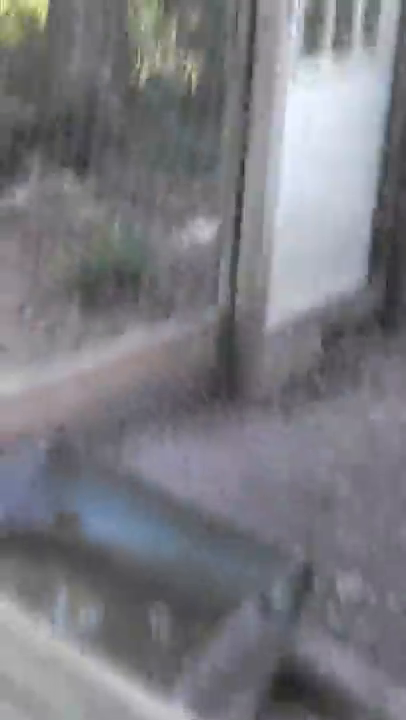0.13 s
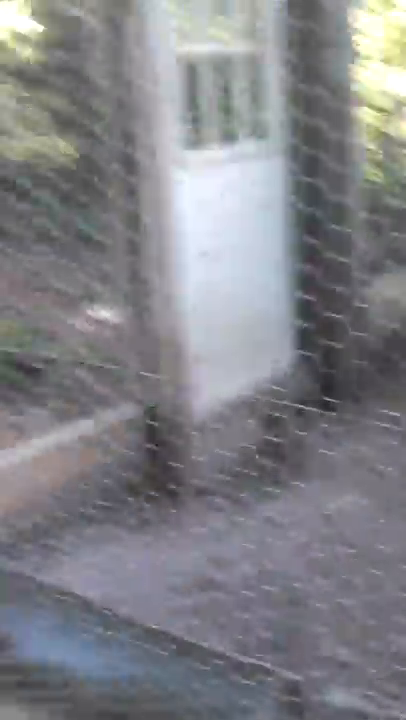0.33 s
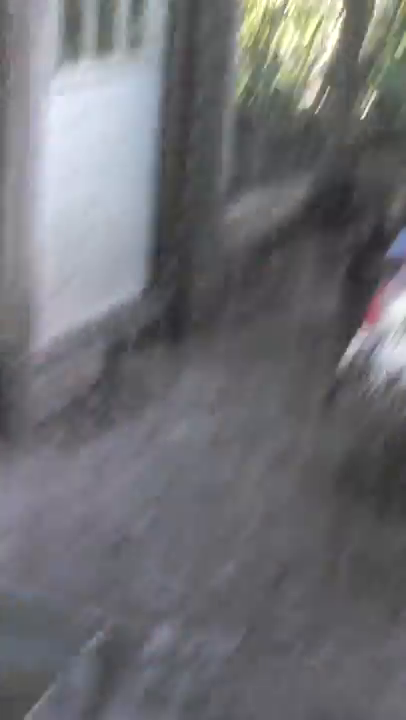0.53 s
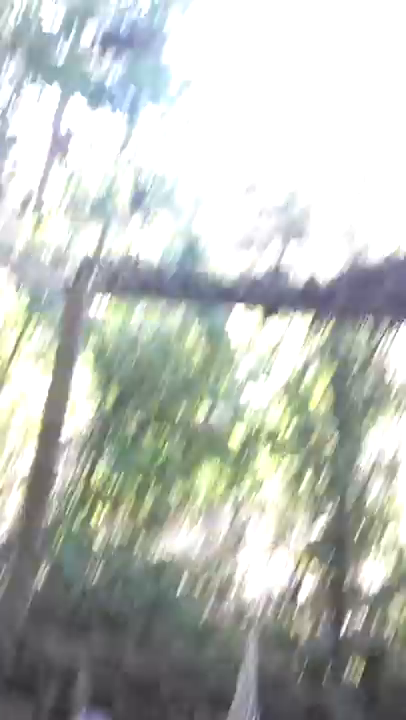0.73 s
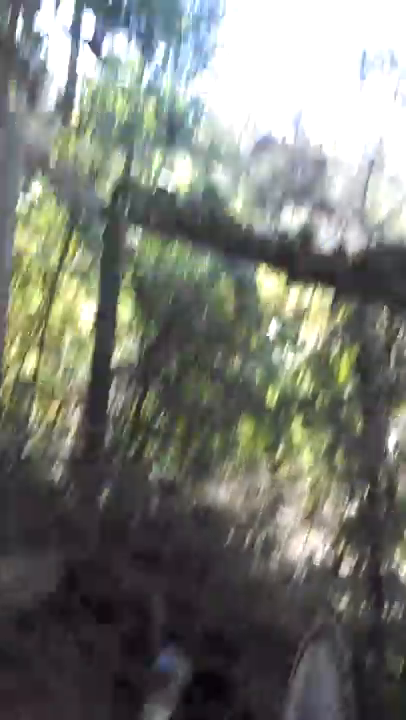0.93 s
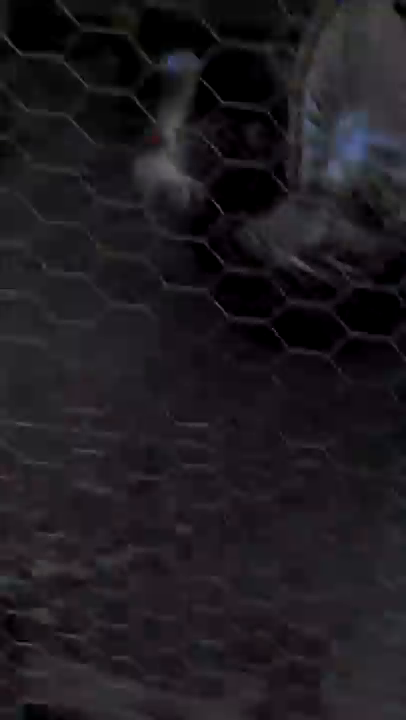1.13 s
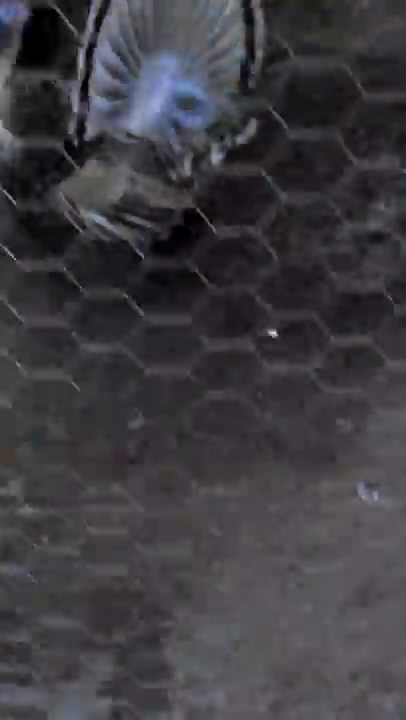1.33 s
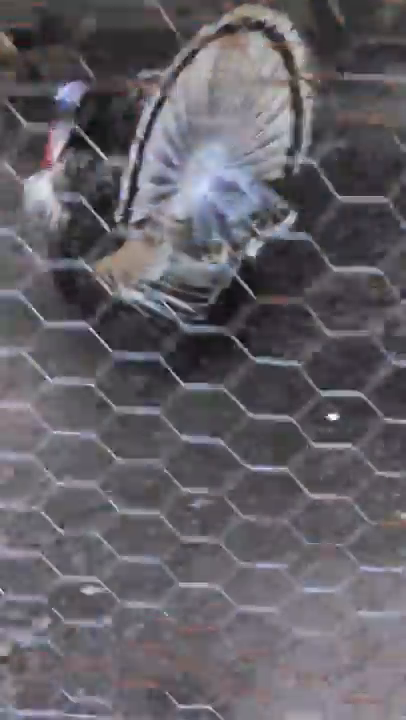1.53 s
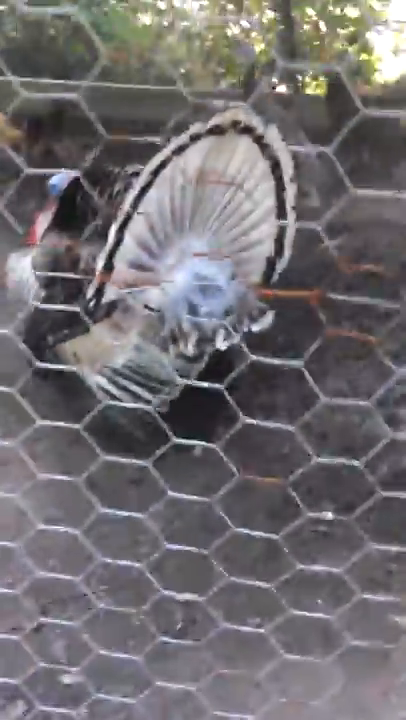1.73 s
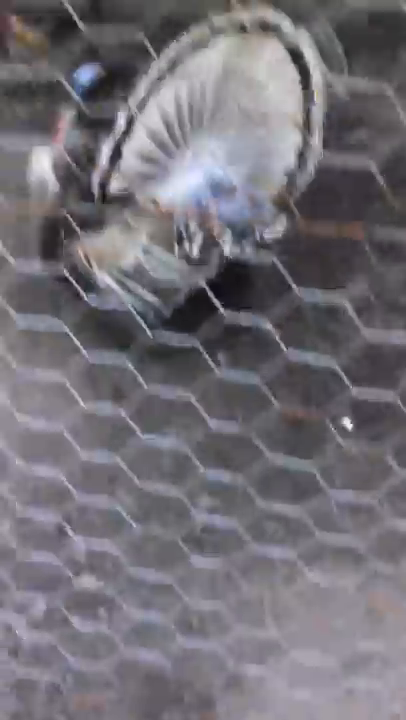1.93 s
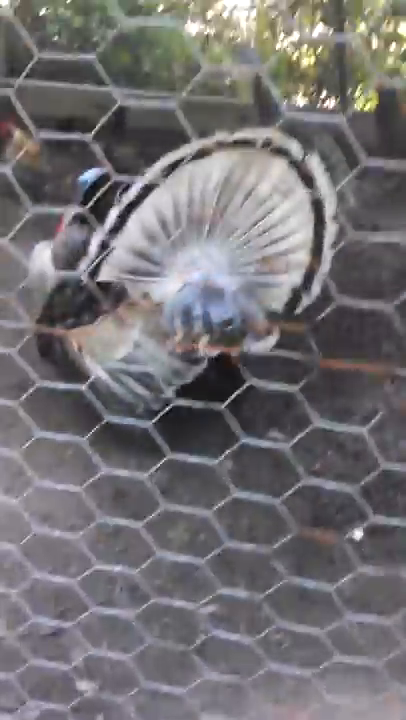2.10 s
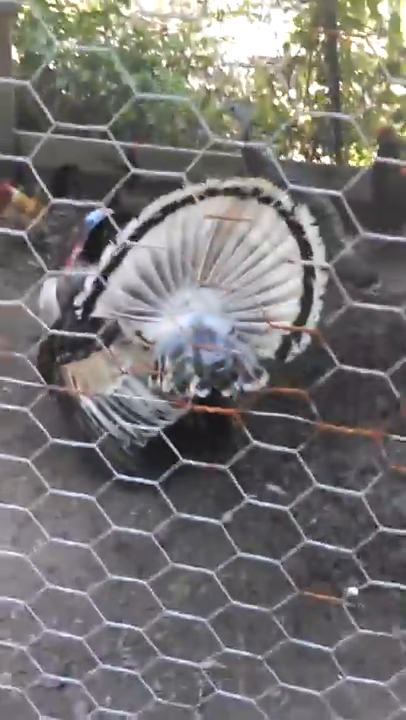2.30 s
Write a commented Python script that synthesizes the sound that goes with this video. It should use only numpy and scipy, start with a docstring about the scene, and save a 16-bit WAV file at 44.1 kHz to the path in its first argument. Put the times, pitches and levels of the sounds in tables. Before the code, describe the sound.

A turkey spits once, sharp and hissing, at 1.5 seconds, with a short deep drum beneath, then drags its wing tips on dirt until about 2. Before that come soft rustles, scuffs, small ticks and a faint whistle near 0.7. Taps land at 1.35 and 1.85. The hand-held microphone thumps now and then, most around 2 seconds. Outdoor air and a distant machine hum continue throughout.

```python
"""An outdoor pen of chicken wire, where a tom turkey struts. He gives one sharp spit (pulses ring his
throat's resonances, then escaping air hisses) over a low drum, and drags his wing tips on the dirt.
Around him are friction sounds (rustles, scuffs), small impacts (ticks, taps), a faint whistle, a soft
low note, a wash of air and the hum of a distant machine. All is heard through a hand-held pair of
microphones that thump now and then."""
import sys
import numpy as np
from scipy import signal
from scipy.fft import rfft, irfft
from scipy.io import wavfile

SR = 44100
rng = np.random.default_rng(int(sys.argv[2]) if len(sys.argv) > 2 else 0)


def bounce(signal):
    """Save signal as a 16-bit WAV file at the path given by the first command-line argument."""
    frames = np.transpose(np.atleast_2d(signal))
    limited = np.clip(frames, -1, 1)
    pcm = np.round(limited * 32767).astype(np.int16)
    wavfile.write(sys.argv[1], SR, pcm)


N = 108397
T = np.arange(N) / SR
HZ = np.fft.rfftfreq(2 * N, 1 / SR)


def amp(db):
    """Amplitude ratio: 20 dB to a factor of ten."""
    return 10 ** (np.asarray(db) / 20)


def read(points):
    """Interpolation of a table over log frequency, at every bin."""
    f, value = np.transpose(points)
    return np.interp(np.log(HZ + 1), np.log(f + 1), value)


def colour(x, spectrum):
    """Minimum-phase filtering: unit white noise takes on the given spectral density."""
    log_gain = np.log(amp(read(spectrum)) * np.sqrt(SR / 2))
    cepstrum = irfft(log_gain)
    cepstrum[1:N] *= 2
    cepstrum[N + 1:] = 0
    return irfft(rfft(x, 2 * N) * np.exp(rfft(cepstrum)))[..., :N]


def noise():
    """Gaussian white noise of unit variance."""
    return rng.standard_normal(N)


def twin_noise(apart=0.3):
    """Partial coherence: an extended source gives nearly the same noise at both microphones."""
    return (noise() + apart * np.array([noise(), noise()])) / np.hypot(1, apart)


def wander(rate_hz):
    """Random modulation: low-passed noise of unit variance."""
    x = irfft(rfft(noise(), 2 * N) * np.exp(-(HZ / rate_hz) ** 2))[:N]
    return x / x.std()


def phasor_wander(rate_hz):
    """Complex modulation: amplitude and phase both drift."""
    return wander(rate_hz) + 1j * wander(rate_hz)


def envelope(start, rise, hold, fall):
    """Linear attack, hold and exponential decay, in seconds."""
    return np.clip((T - start) / rise, 0, 1) * np.exp(-np.maximum(T - start - rise - hold, 0) / fall)


def swell(centre, width):
    """Gaussian envelope, in seconds."""
    return np.exp(-.5 * ((T - centre) / width) ** 2)


def tone_burst(time_s, width_s, hz, db):
    """Wave packet: a sinusoid under a Gaussian envelope."""
    return amp(db) * swell(time_s, width_s) * np.cos(2 * np.pi * hz * (T - time_s))


def resonate(x, hz, bandwidth):
    """Damped resonance with unit gain at its peak."""
    r = np.exp(-np.pi * bandwidth / SR)
    return 2 * signal.lfilter([1 - r], [1, -r * np.exp(2j * np.pi * hz / SR)], x + 1e-18).real


def friction(strokes, spectrum, grain_db=2):
    """Sliding friction: grainy noise whose strokes add in power."""
    level = np.sqrt(sum((amp(db) * swell(s, width)) ** 2 for s, width, db in strokes))
    return colour(twin_noise() * level * amp(grain_db * wander(rate_hz=400)), spectrum)


def strikes(rows, ring_db, snap_db):
    """Impact excitation: each strike is an impulse and a decaying random rattle."""
    out = noise() * amp(ring_db) * sum(amp(db) * envelope(s, 1 / SR, 0, ring) for s, db, ring in rows)
    for s, db, _ in rows:
        out[round(s * SR)] += amp(db + snap_db)
    return out


def off_axis(x, lead_s, pan_db):
    """Time and level differences give direction; positive values favour the left microphone."""
    half_lead = np.exp(1j * np.pi * HZ * lead_s)
    pair = irfft(rfft(x, 2 * N) * np.array([half_lead, 1 / half_lead]))[:, :N]
    return pair * amp([[pan_db / 2], [-pan_db / 2]])


# Inequality between the microphones (frequency [Hz], share [0-1])
SHADOW = [(60, 0.5), (150, 0.52), (350, 0.3), (700, 0.42), (1400, 1), (3000, 0.73), (15000, 0.98)]

def shaded(x, side):
    """Acoustic shadow: the housing screens one microphone, most in the treble; side > 0 favours left."""
    share = side * read(SHADOW)
    return irfft(rfft(x, 2 * N) * np.array([1 + share, 1 - share]))[:, :N]


# Outdoor wash (frequency [Hz], density [dB/Hz])
AIR_SPECTRUM = [(20, -95), (45, -67.5), (68, -65.5), (110, -68.5), (190, -78.5), (330, -71.5), (480, -73.5),
                (660, -79.5), (820, -77.5), (1100, -81), (2400, -86), (4000, -88), (7000, -87.5),
                (8300, -101.5), (10000, -109), (15000, -110)]
# Its likeness at the two microphones (frequency [Hz], correlation [0-1])
AIR_CORRELATION = [(100, .93), (350, 0.88), (700, 0.61), (1500, 0.81), (12000, 0.6)]

def air(swell_db=0.5):
    """Ambient field: common and independent noise mix to a partly coherent wash."""
    same = read(AIR_CORRELATION)
    shared, left, right = rfft(np.array([noise(), noise(), noise()]), 2 * N)
    wash = irfft(np.sqrt(same) * shared + np.sqrt(1 - same) * np.array([left, right]))[:, :N]
    return colour(wash * amp(swell_db * wander(rate_hz=22)), AIR_SPECTRUM)


def tone(hz, waver):
    """Line broadening: a tone of unit power wavers slowly."""
    drift = 1 + waver * phasor_wander(rate_hz=4.6)
    return np.sqrt(2 / (1 + 2 * waver ** 2)) * (drift * np.exp(2j * np.pi * hz * T)).real


# The machine's lesser tones (frequency [Hz], level [dB])
HUM_LINES = [(293, -59), (376, -53), (467, -60.5), (540.5, -58.5), (563.6, -54), (727, -59.5),
             (751.8, -55.5)]
# Course of its main tone (time [s], level [dB])
DRONE_LEVEL = [(0, -43.5), (.2, -42.5), (.42, -57.5), (.8, -54.5), (.9, -46), (1.12, -42.5), (1.35, -49),
               (1.55, -51), (1.75, -50), (2.0, -48), (2.25, -46), (2.46, -43.5)]
HUM_LEAD_S, HUM_PAN_DB = -0.00013, -4.5

def hum(drone_hz=514.4):
    """Line spectrum of a distant machine; the main tone flutters, and comes and goes."""
    flutter = 0.27 * phasor_wander(rate_hz=29.6)
    drone = tone(drone_hz, waver=0.2) + (flutter * np.exp(2j * np.pi * drone_hz * T)).real
    drone *= amp(np.interp(T, *np.transpose(DRONE_LEVEL)))
    lines = sum(amp(db) * tone(hz, waver=0.45) for hz, db in HUM_LINES)
    return off_axis(drone + lines, HUM_LEAD_S, HUM_PAN_DB)


# Bumps on the microphones (time [s], width [s], frequency [Hz], level [dB])
MIC_BUMPS = [(.012, 0.011, 65, -38.5), (.34, 0.011, 68, -37), (1.036, 0.0088, 70.5, -29.5),
             (1.36, 0.04, 66.6, -34.5), (1.49, 0.0063, 99, -27), (1.846, 0.0044, 141, -27.5),
             (1.866, 0.0071, 114, -25.5), (1.888, 0.018, 78, -31), (1.926, .0095, 76, -23.5),
             (1.952, 0.01, 78.6, -21.5), (2.018, 0.0064, 115, -23), (2.031, 0.012, 85, -27.5),
             (2.07, .017, 55.2, -33), (2.289, 0.032, 65.6, -34)]

def thumps(rumble_db=-12.5):
    """Low-frequency transients: handling or puffs of air bump the microphones, with a little rumble."""
    level = sum(amp(db) * swell(s, width) for s, width, _, db in MIC_BUMPS)
    rumble = amp(rumble_db) * wander(rate_hz=310) * level
    return shaded(rumble + sum(tone_burst(*row) for row in MIC_BUMPS), -1.15)


# Dry brushing (time [s], width [s], body gain [dB], fizz gain [dB])
RUSTLE_STROKES = [(.014, .014, 3.5, 4), (.089, 0.059, -1, -1.5), (.22, 0.073, -6.5, -13),
                  (0.269, 0.0023, -2.5, -15), (.287, 0.0027, -5, -15), (.304, .002, -5, -14),
                  (0.328, .003, -3.5, -14), (.4, 0.03, -6.5, -9), (.536, 0.0053, -4, -12),
                  (.562, 0.022, -7, -12), (.66, 0.14, -10, -34), (.815, 0.0069, -4, -7),
                  (.861, .028, 0, -4), (1.09, 0.29, -14.5, -17.5), (1.356, 0.022, -4, -12),
                  (1.67, .011, -8, -11), (2.4, .078, -13.5, -36)]
# Its body and its fizz (frequency [Hz], density [dB/Hz])
RUSTLE_SPECTRUM = [(400, -86), (800, -74.5), (1500, -83), (2300, -76), (4000, -74), (5500, -75),
                   (7000, -74), (8400, -82.5), (10000, -93), (15000, -115)]
FIZZ_SPECTRUM = [(4000, -110), (8000, -73), (10500, -93.5), (12500, -82), (15000, -89.5)]

def rustles():
    """Friction noise in two bands: dry brushing with a finer fizz on top."""
    body = friction([(s, width, db) for s, width, db, _ in RUSTLE_STROKES], RUSTLE_SPECTRUM)
    fizz = friction([(s, width, db) for s, width, _, db in RUSTLE_STROKES], FIZZ_SPECTRUM)
    return body + fizz


# Strokes on dirt (time [s], width [s], grit gain [dB], note frequency [Hz], note level [dB])
SCUFF_STROKES = [(.395, .015, 3.5, 345, -43.5), (0.648, .015, 4.5, 406, -44), (2.012, .011, 2, 337, -43.5),
                 (2.173, 0.013, 4, 870, -42), (2.371, 0.021, 1, 344, -40)]
# Their grit (frequency [Hz], density [dB/Hz])
SCUFF_SPECTRUM = [(100, -89), (380, -69.5), (650, -78), (1000, -77), (1550, -73.5), (2400, -81.5),
                  (3700, -79), (5000, -100), (8000, -100), (15000, -115)]

def scuffs(bandwidth_hz=77):
    """Friction on dirt, each stroke with a hollow note from a noise-driven resonance."""
    notes = sum(amp(db) * resonate(noise() * swell(s, width), hz, bandwidth_hz)
                for s, width, _, hz, db in SCUFF_STROKES)
    grit = friction([row[:3] for row in SCUFF_STROKES], SCUFF_SPECTRUM)
    return grit + notes * np.sqrt(SR / (np.pi * bandwidth_hz))


# Fine impacts (time [s], body gain [dB], edge gain [dB])
TICK_STRIKES = [(.563, -12, 1), (0.724, 2.5, 0), (.731, -5, -4), (0.936, -4, -2), (.946, -2, -9),
                (1.014, -4, -1.5), (1.074, 6.5, -3), (1.135, -2, -3), (1.218, -0.5, 0), (1.287, 2, 7),
                (1.29, -6, 2)]
# Their body and their fizzy edge (frequency [Hz], density [dB/Hz])
TICK_SPECTRUM = [(1000, -100), (4000, -74.5), (7000, -65.5), (9500, -80), (15000, -100)]
EDGE_SPECTRUM = [(4000, -100), (8500, -77.5), (12500, -81), (15000, -83)]

def ticks(decay_s=0.00085):
    """Very brief impacts have broad spectra, here weighted to the treble."""
    body = strikes([(s, db, decay_s) for s, db, _ in TICK_STRIKES], ring_db=0, snap_db=3)
    edge = strikes([(s, db, decay_s) for s, _, db in TICK_STRIKES], ring_db=0, snap_db=3)
    return colour(body, TICK_SPECTRUM) + colour(edge, EDGE_SPECTRUM)


# Pitch contour (time [s], frequency [Hz])
WHISTLE_PITCH = [(.6, 2640), (.66, 2660), (.7, 2720), (.735, 2780), (.765, 2650), (.81, 2440)]

def whistle(level_db=-29, roughness=0.29):
    """Frequency glide: a faint, thin tone climbs a little and drops away."""
    cycles = np.cumsum(np.interp(T, *np.transpose(WHISTLE_PITCH))) / SR
    fuzz = 1 + roughness * phasor_wander(rate_hz=80)
    return amp(level_db) * swell(centre=0.717, width=0.034) * (fuzz * np.exp(2j * np.pi * cycles)).real


# Sharp impacts (time [s], body gain [dB], snap gain [dB], decay time [s])
TAP_STRIKES = [(1.3472, -9.5, -6, 0.0032), (1.8621, 2, -2, 0.002)]
# Their body and their snap (frequency [Hz], density [dB/Hz])
TAP_SPECTRUM = [(100, -64), (600, -50), (1200, -46), (2200, -55), (3500, -61), (8000, -92)]
SNAP_SPECTRUM = [(800, -86), (2500, -50.5), (4400, -53), (6500, -61.5), (9500, -82), (15000, -92)]

def taps():
    """Heavily damped impacts: two taps, each a dull body and a bright snap."""
    body = strikes([(s, db, ring) for s, db, _, ring in TAP_STRIKES], ring_db=-8.5, snap_db=12)
    snap = strikes([(s, db, ring) for s, _, db, ring in TAP_STRIKES], ring_db=-8.5, snap_db=12)
    return colour(body, TAP_SPECTRUM) + colour(snap, SNAP_SPECTRUM)


# Throat resonances; those near 1.7 kHz last longest as the beak opens
# (frequency [Hz], bandwidth [Hz], density [dB/Hz], hold [s])
FORMANTS = [(372, 31, -56, .005), (644, 74, -43, 0.0048), (827, 104, -44.5, 0.0057), (987, 73, -49, 0.0067),
            (1215, 200, -49.5, 0.0067), (1643, 110, -49.5, 0.015), (1836, 93, -48.5, .011),
            (2400, 290, -54.5, 0.0079), (2880, 450, -56.5, 0.0071), (3470, 170, -60, 0.0055)]
# Escaping air (frequency [Hz], density [dB/Hz])
HISS_SPECTRUM = [(200, -64.5), (600, -71.5), (1100, -66), (1500, -68.5), (2500, -69), (4000, -64.5),
                 (5500, -65.5), (7200, -59.5), (8400, -70), (9800, -78.5), (15000, -83)]

def spit(start_s=1.501, pulse_hz=401.8, roughness=0.42, rise_s=0.0027, fall_s=0.0062):
    """Source and filter: a few rough pulses ring the throat, then the air escapes as a hiss."""
    cycles = np.maximum(T - start_s, 0) * pulse_hz
    onsets = np.flatnonzero(np.diff(np.ceil(cycles))) + 1
    pulses = np.zeros(N)
    pulses[onsets] = np.sqrt(SR / pulse_hz)
    pulses[onsets[1::2]] *= 0.19  # strong and weak pulses alternate
    drive = np.sqrt(SR / 2) * (pulses + roughness * noise())
    buzz = np.zeros(N)
    for k, (hz, bandwidth, db, hold) in enumerate(FORMANTS):
        gate = envelope(start_s - rise_s / 2, rise_s, hold, fall_s)
        buzz += (-1) ** k * amp(db) * resonate(drive * gate, hz, bandwidth)
    breath = twin_noise() * amp(wander(rate_hz=120))
    hiss = colour(breath * envelope(start=1.4913, rise=0.045, hold=0.027, fall=0.035), HISS_SPECTRUM)
    return shaded(buzz, 1) + shaded(hiss, -1.12)


def drum():
    """A low-frequency wave packet: the turkey's deep drum, under the spit."""
    boom = tone_burst(time_s=1.547, width_s=0.023, hz=74.5, db=-15.5)
    return off_axis(boom, lead_s=0.00014, pan_db=0.6)


# Wing tips on the ground (frequency [Hz], density [dB/Hz])
DRAG_SPECTRUM = [(300, -70), (1050, -79.5), (1500, -68.5), (2200, -80), (3200, -70), (3900, -79),
                 (5200, -85.5), (7000, -82), (9500, -102), (15000, -104)]

def wing_drag(grain_db=0.51):
    """Sliding friction: stiff feathers brush the dirt."""
    brushing = twin_noise() * amp(grain_db * wander(rate_hz=200))
    return colour(brushing * envelope(start=1.616, rise=0.1, hold=0.12, fall=0.1), DRAG_SPECTRUM)


def low_note():
    """A narrow-band burst: one soft note swells from the direction of the hum."""
    note = tone_burst(time_s=1.705, width_s=0.028, hz=373, db=-40)
    return off_axis(note, HUM_LEAD_S, HUM_PAN_DB)


def pen(x, t60_s=0.083, echoes_per_s=2000, echo_db=-14):
    """Early reflections: the ground, posts and door scatter sparse, fast-decaying echoes."""
    t = T[:SR // 3]
    response = rng.standard_normal((2, len(t))) * amp(-60 * t / t60_s)
    response *= rng.random((2, len(t))) < echoes_per_s / SR
    response /= np.linalg.norm(response, axis=1, keepdims=True)
    return x + amp(echo_db) * signal.fftconvolve(x.mean(0)[None], response, axes=1)[:, :N]


def scene():
    """Superposition: the turkey and the small sounds of the pen, over hum and air."""
    left = shaded(wing_drag() + scuffs() + whistle(), 0.9)
    right = shaded(ticks() + taps() + rustles(), -1.12)
    return pen(spit() + left + right) + drum() + thumps() + hum() + low_note() + shaded(air(), 0.95)


# Channel balance (frequency [Hz], left minus right [dB])
CHANNEL_BALANCE = [(60, -1.6), (400, -2.5), (1300, -2), (2700, -0.5), (4400, -2), (15000, -.4)]

def record(dry, delay_s=16 / SR, low_cut_hz=21, high_cut_hz=15600):
    """Differential pair: each channel subtracts the other microphone, delayed, to widen the image."""
    mics = rfft(dry, 2 * N)
    half_phase = np.pi * HZ * delay_s
    crossed = mics - mics[::-1] * np.exp(-2j * half_phase)
    loss = 2 * np.hypot(np.sin(half_phase), read(SHADOW) * np.cos(half_phase))
    lean = amp(read(CHANNEL_BALANCE) / 2)
    pair = irfft(crossed / loss * np.array([lean, 1 / lean]))[:, :N]  # dividing restores the bass
    pair = signal.sosfilt(signal.butter(2, low_cut_hz, "high", fs=SR, output="sos"), pair)
    low_pass = signal.firwin(511, high_cut_hz, window=("kaiser", 9), fs=SR)
    return signal.oaconvolve(pair, low_pass[None], "same")


dry = scene()
out = record(dry)
bounce(out)
```